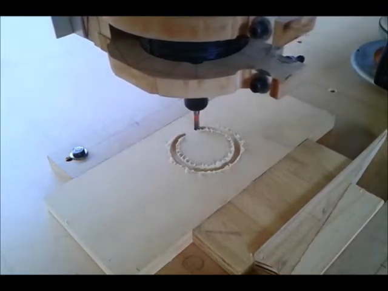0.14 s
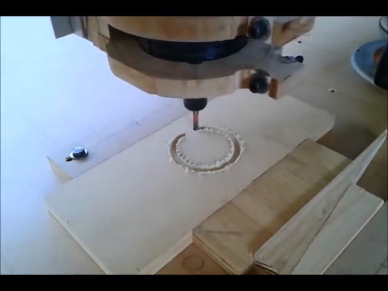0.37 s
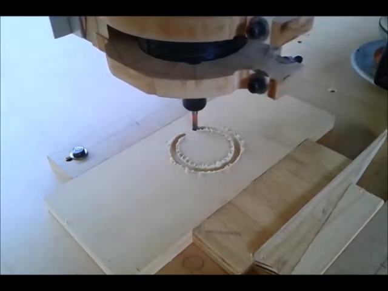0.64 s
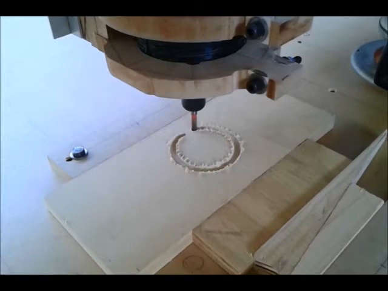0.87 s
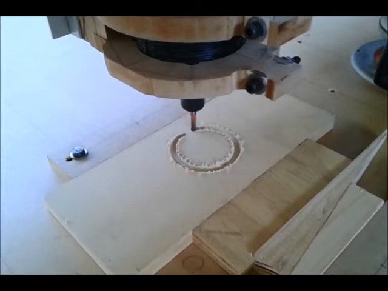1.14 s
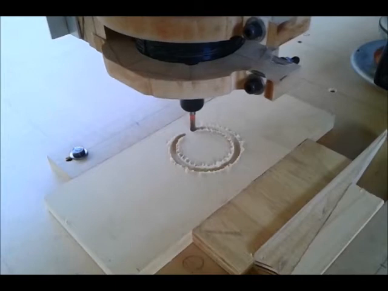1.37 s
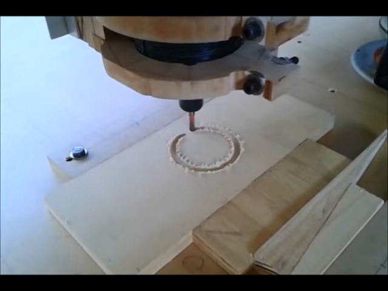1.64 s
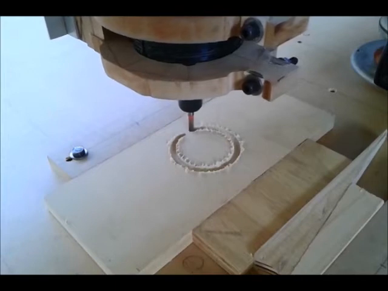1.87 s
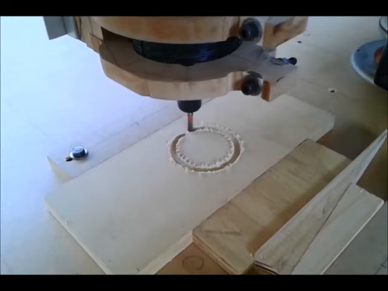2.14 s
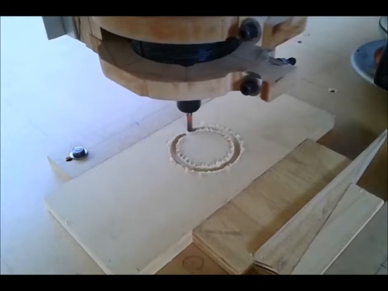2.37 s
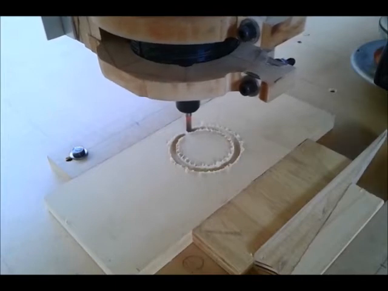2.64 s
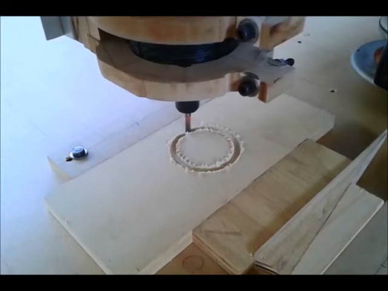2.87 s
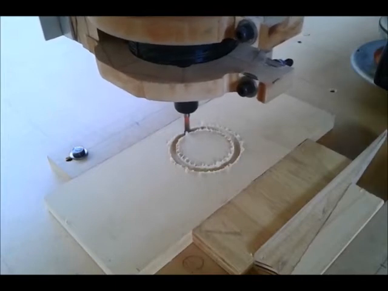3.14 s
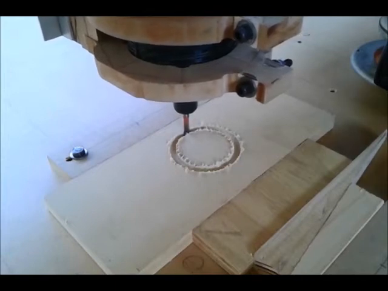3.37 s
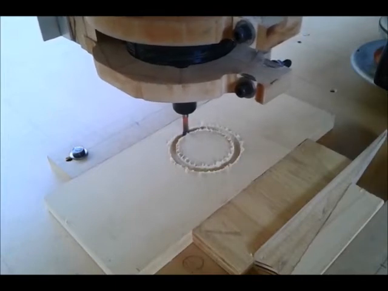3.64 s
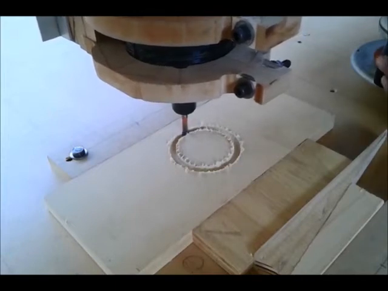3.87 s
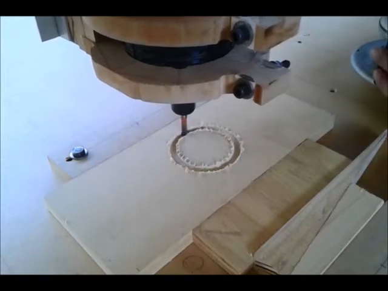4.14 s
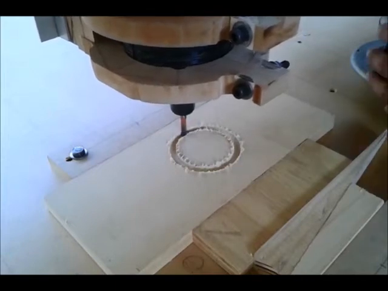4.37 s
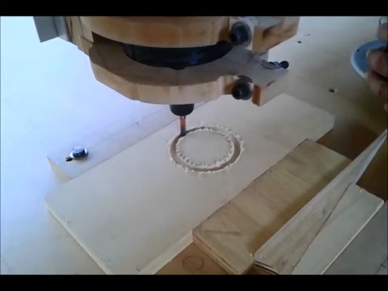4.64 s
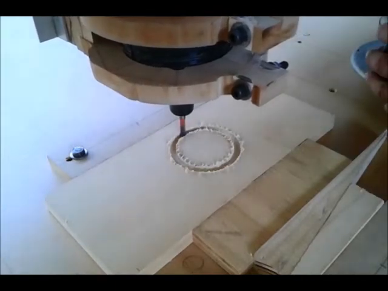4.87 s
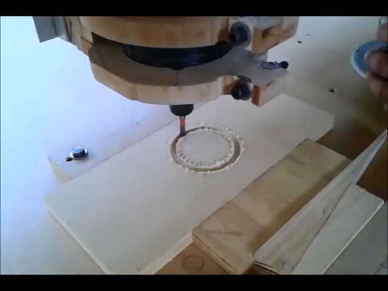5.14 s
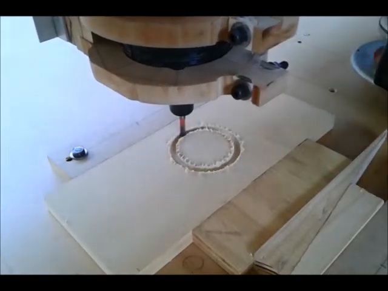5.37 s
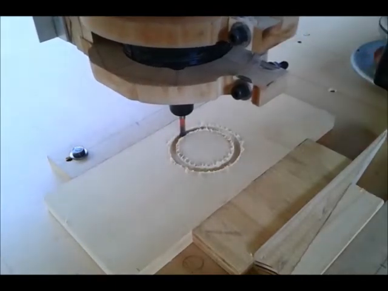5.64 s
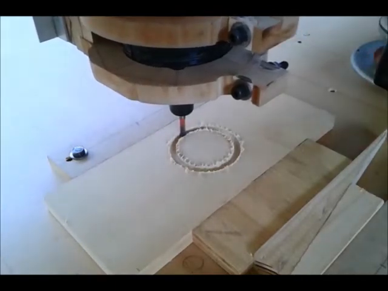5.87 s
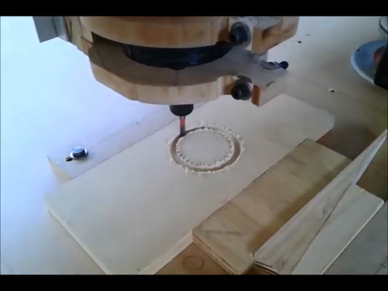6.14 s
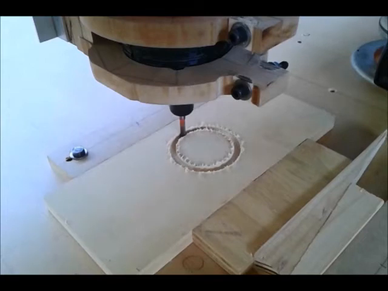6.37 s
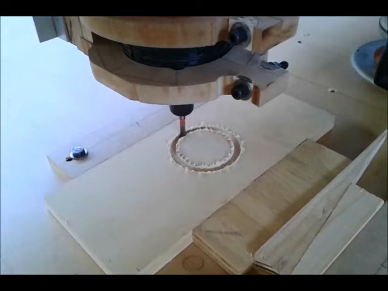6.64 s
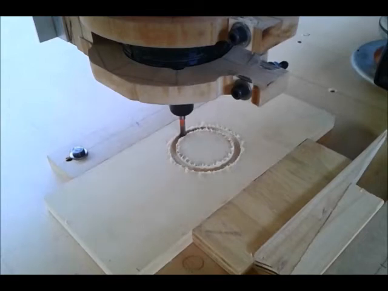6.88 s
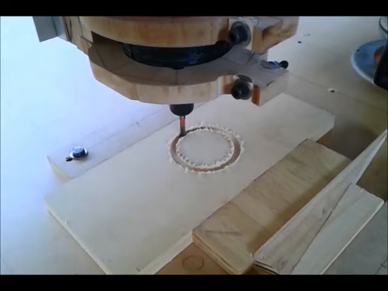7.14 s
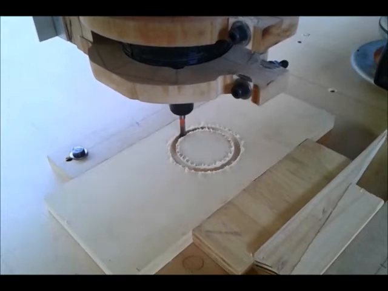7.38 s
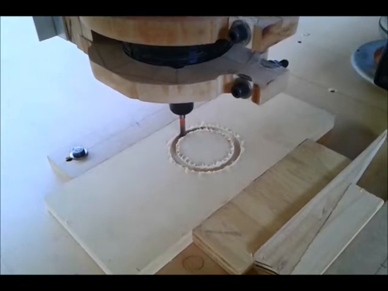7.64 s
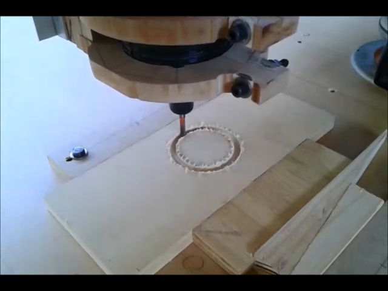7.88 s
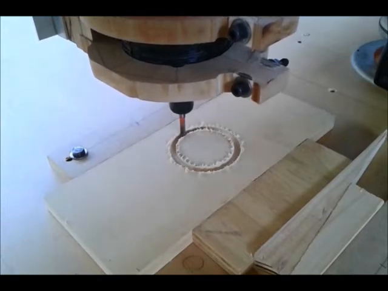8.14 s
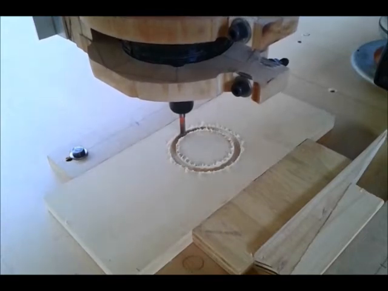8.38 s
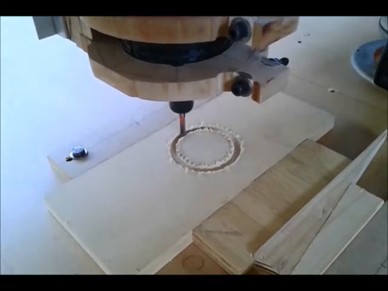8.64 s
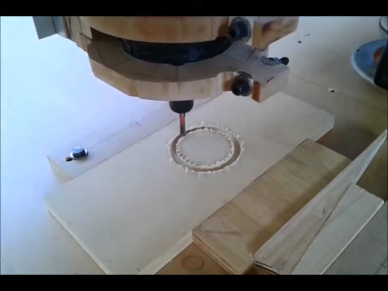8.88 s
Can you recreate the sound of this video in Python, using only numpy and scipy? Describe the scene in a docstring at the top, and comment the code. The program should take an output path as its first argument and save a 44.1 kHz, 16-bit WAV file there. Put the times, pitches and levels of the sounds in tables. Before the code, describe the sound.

A mains-powered hand router runs without a break close to a small camera microphone. It first cuts wood with a hard, steady buzzing whine and rushing air, turns rougher around three seconds, then speeds up slightly as the load eases. Faint feed motor hums change notes underneath. A single dull table knock comes halfway, then the tool spins lighter to the end. Dry, mono home workshop sound.

```python
"""Router cutting in a wooden frame

A mains-driven hand router whines close to a mono camera microphone: its bit bites a groove, then runs lighter
and the shaft speeds up. Shaft orders, fan and commutator are sines tied to one shaft phase, fuzzy whistles,
mostly from the bearings, are noise bands that follow it, and cooling air is a roar of shaped noise. Table
rumble, mains hum and feed motor notes lie underneath; one dull knock comes halfway."""
import sys
import numpy as np
from scipy import signal
from scipy.io import wavfile
from scipy.ndimage import uniform_filter1d

SR = 44100
rng = np.random.default_rng(int(sys.argv[2]) if len(sys.argv) > 2 else 0)


def amplitude_ratio(level_db):
    """Convert a level in decibels to the matching linear amplitude (field) ratio."""
    exponent = np.asarray(level_db, float) / 20
    return 10 ** exponent


def generate_wav(sig):
    """Save sig (samples, or channels by samples) to the path in sys.argv[1] as 16-bit PCM at SR."""
    pcm = np.round(np.clip(np.atleast_2d(sig).T, -1, 1) * 32767).astype(np.int16)
    wavfile.write(sys.argv[1], SR, pcm)


N = 397341
T = np.arange(N) / SR
SLOW = T[::100]  # order levels change slowly: worked out on every hundredth sample
MAINS_BEAT_HZ = 100  # twice the mains rate


def evened(x):
    """Scales to rms 1."""
    return x / np.sqrt(np.mean(x ** 2) + 1e-20)


def read(points, hz):
    """A spectrum read on a log-frequency axis."""
    f, value = np.transpose(points)
    return np.interp(np.log(hz + 1), np.log(f + 1), value)


def wander(per_s):
    """Slow random curve of rms 1: noise lowpassed at per_s Hz."""
    knots = rng.standard_normal(N // 200 + 2)
    smooth = signal.lfilter([1], [1, -np.exp(-2 * np.pi * per_s * 200 / SR)], knots)
    return np.interp(np.arange(N) / 200, np.arange(len(knots)), evened(smooth))


def tone(turns, db, waver_db, per_s):
    """A sine of given rms, at a random phase, whose strength wavers."""
    level = amplitude_ratio(db + waver_db * wander(per_s))
    return level * np.sqrt(2) * np.sin(2 * np.pi * (turns + rng.random()))


def coloured(db_field):
    """Noise from random short-time spectra under a bins x frames field of dB, at rms 1."""
    a, b = rng.standard_normal((db_field.shape[1], db_field.shape[0], 2)).T
    spectra = (a + 1j * b) * amplitude_ratio(db_field)
    return evened(signal.istft(spectra, nperseg=1024, noverlap=768)[1][:N])


def noise_grid():
    """Frame count and column of bin frequencies for coloured()."""
    return N // 256 + 5, np.fft.rfftfreq(1024, 1 / SR)[:, None]


def staged(values, at=T):
    """One value for each stage of the cut, blended as the cut goes on."""
    # progress of the cut: t/s, stage (0 deep with both flutes, 1 one flute biting, 2 skimming, 3 running free)
    stage = [(0, 0), (2.4, 0.06), (2.82, 0.36), (2.95, 1.53), (3.3, 0.6), (4.3, 1.2), (5.4, 1.87), (6.1, 2),
             (7.1, 2), (7.7, 3), (9.01, 3)]
    progress = np.interp(at, *np.transpose(stage))
    return np.interp(progress, np.arange(len(values)), values)


def order_db(multiple):
    """Level of one shaft order: its stages plus its swells."""
    # orders of bit and frame, housing, fan and commutator:
    # multiple of the shaft speed, then rms level/dB in each of the four stages
    order_levels = [(1, -37, -31.5, -41.5, -42), (2, -19.5, -28.5, -29, -31.5), (3, -51, -28.5, -33, -33),
                    (4, -28, -32.5, -36.5, -33.5), (5, -52, -32, -33.5, -37), (6, -39, -30, -33.5, -38.5),
                    (7, -36.5, -27, -31, -40), (8, -19.5, -22.5, -23, -36), (9, -34, -20.5, -24, -30),
                    (10, -35.5, -31, -34, -30.5), (11, -32, -32, -33, -29.5), (12, -37, -38, -35, -54),
                    (13, -42, -42, -35, -34), (14, -37, -35, -40, -39), (17, -46, -39, -41, -35),
                    (18, -52, -46, -48, -46), (15, -22.5, -23, -20.5, -20.5), (16, -36.5, -40, -32, -36),
                    (22, -28, -30, -25.5, -23.5)]
    # single orders swell or sink for a moment: centre t/s, time from there to 1/e of the change/s,
    # multiple of the shaft speed, change/dB
    swells = [(0, .4, 10, -8), (0, 0.49, 11, -8), (0.503, 0.11, 8, -3.5), (1.08, .12, 1, -10),
              (1.104, 0.26, 8, 2), (2.2, 0.37, 5, 8), (2.2, .25, 10, 7), (2.4, 0.22, 8, -4.5),
              (2.45, 0.3, 1, 1.5), (2.6, 0.33, 15, -3), (2.8, .06, 2, -3), (2.93, .12, 2, 8.5),
              (2.92, 0.18, 9, -14), (2.95, .15, 6, -6), (3.05, .35, 13, 6), (3.2, .15, 7, -1),
              (3.35, 0.22, 10, -8), (3.42, .07, 11, -14), (3.6, 0.97, 1, 7.5), (3.65, .2, 12, 4),
              (2.55, 0.082, 9, 9), (2.497, 0.49, 4, 2.5), (2.7, 0.19, 7, -1.5), (2.85, .12, 8, -8),
              (2.964, .07, 7, 7), (3.206, 0.13, 9, 3), (3.02, .15, 4, 4), (3.25, 0.5, 4, 11),
              (3.414, 0.13, 8, 5.5), (3.48, 0.037, 9, -13), (3.65, .06, 15, -14), (3.55, 0.34, 15, -7),
              (3.75, 0.44, 16, 13), (3.52, 0.16, 7, 7), (3.57, 0.049, 8, -11), (3.1, .2, 3, 2.5),
              (3.75, 0.27, 3, 7), (3.72, 0.08, 9, 6.5), (3.8, .1, 8, 2), (3.8, 0.27, 6, 8.5),
              (4.1, .25, 10, 2), (4.094, 0.12, 18, 15), (4.015, 0.12, 8, -13), (4.06, .13, 9, -13),
              (4.196, 0.49, 5, 8.5), (4.04, 0.08, 7, -1), (4.3, 0.26, 7, 7), (4.35, 0.18, 6, -20),
              (4.407, .18, 8, -9), (4.425, 0.14, 9, 6), (4.5, .2, 17, 6), (4.55, 0.32, 16, -9),
              (4.65, 0.27, 4, -3), (4.62, 0.38, 2, -6), (4.95, 0.12, 7, -31), (4.85, 0.25, 1, 4.5),
              (5.1, 0.59, 15, -4.5), (5.052, 0.38, 5, 6), (5.1, 0.4, 9, 2), (6.2, 0.27, 1, -6),
              (7.35, 0.16, 7, 5)]
    level = staged(next(row[1:] for row in order_levels if row[0] == multiple), SLOW)
    for s, half, k, db in swells:
        if k == multiple:
            level = level + db * np.exp(-((SLOW - s) / half) ** 2)
    return np.interp(T, SLOW, level)


def shaft_turns():
    """Shaft phase in turns: the speed sags under load, rises as the cut eases and trembles slightly."""
    # shaft speed: t/s, f/Hz
    speed = [(0, 401.8), (1.8, 401.6), (2.4, 401.1), (2.68, 400.7), (2.94, 400.6), (3.07, 401),
             (3.33, 402.6), (3.59, 404.4), (3.85, 406), (4.24, 407.8), (4.63, 409.4), (5.02, 410.6),
             (5.28, 411.1), (5.73, 411.8), (6.39, 412.3), (7.05, 412.8), (8.04, 413.2), (9.01, 413.3)]
    tremble_hz = 0.12 * wander(8)
    return np.cumsum(np.interp(T, *np.transpose(speed)) + tremble_hz) / SR


def shaft_orders(turns):
    """Bit and unbalance shake the frame on whole multiples of the shaft speed."""
    # weak orders that come and go: multiple of the shaft speed, rms level/dB
    faint = [(19, -50), (20, -42), (21, -48), (23, -60), (27, -47.5), (30, -51)]
    strong = sum(tone(k * turns, order_db(k), 1.0, 3.8) for k in range(1, 10))
    return strong + sum(tone(k * turns, db, 1.6, 3) for k, db in faint)


def rotor(turns):
    """Fan, commutator and housing tones; torque throbs at twice the mains rate and splits side tones off the fan."""
    fan_blades, bars = 15, 22
    # housing tones: multiples of the shaft speed
    housing_orders = (10, 11, 12, 13, 14, 16, 17, 18)
    # tones one mains beat under (first row) and over (second row) the fan tone: rms level/dB in each stage
    side_tones = [(-48, -38, -31, -27.5), (-34, -29.5, -35.5, -37)]
    under_db, over_db = map(staged, side_tones)
    fan_turns, beat = fan_blades * turns, MAINS_BEAT_HZ * T
    fan = tone(fan_turns, order_db(fan_blades), 0.68, 9.6)
    sides = tone(fan_turns - beat, under_db, 1.5, 4.5) + tone(fan_turns + beat, over_db, 1.5, 4)
    commutator = tone(bars * turns, order_db(bars), 0.93, 6.9)
    housing = sum(tone(k * turns, order_db(k), 2.2, 2.3) for k in housing_orders)
    return fan + commutator + sides + housing


def bearing(turns):
    """Fuzzy whistles between and beside the orders, most of them likely from the bearings: noise bands carried
    by the shaft."""
    # whistles: multiple of the shaft speed, width/Hz, rms level/dB cutting deep, rms level/dB later
    whistles = [(2.0, 28, -45, -30), (2.562, 24, -33, -28.5), (3.58, 7, -45, -39), (5.58, 6, -45, -40),
                (7.76, 20, -32, -50), (7.94, 6, -30, -50), (8.94, 6, -30, -50), (9.94, 6, -35, -50)]
    out = np.zeros(N)
    for multiple, width_hz, *stage_db in whistles:
        pole = np.exp(-np.pi * width_hz / SR)
        a, b = signal.lfilter([1], [1, -pole], rng.standard_normal((2, N)))
        band = ((a + 1j * b) * np.exp(2j * np.pi * multiple * turns)).real
        out += amplitude_ratio(staged(stage_db)) * evened(band)
    return out


def roar(turns):
    """Air and chips roar through the frame as shaped noise, pulsing a little each turn and each mains beat."""
    # spectrum of air and wood before scaling: f/Hz, level/dB per Hz
    air = [(60, -31.5), (130, -26.5), (300, -17), (600, -5), (900, -.5), (1250, -2.5), (1600, -10.5),
           (2050, -15.5), (2550, -10.5), (3000, -5.5), (4300, -4.5), (5150, -13), (7300, -13), (9000, -15),
           (10300, -20), (13500, -25.5)]
    # resonances of frame and housing, on the same scale:
    # f/Hz, width at -6 dB/Hz, level/dB cutting deep, level/dB running light
    rings = [(831, 29, -16.5, 4), (3160, 120, -1, -11), (3840, 150, -2.5, -6.5), (6190, 920, -4.5, -4.5),
             (200, 62, -12.5, -31.5)]
    # roar in each stage: level/dB
    roar_db = (-15.5, -16, -15, -14.5)
    # how far the roar has turned light in each stage: share (0-1)
    easing = (.2, .4, .45, .9)
    frames, hz = noise_grid()
    eased = staged(easing)
    share = np.clip(eased[np.minimum(np.arange(frames) * 256, N - 1)], 0, 1)
    power = amplitude_ratio(2 * read(air, hz))  # amp of doubled dB is power
    for f, width, deep_db, light_db in rings:
        ring_db = deep_db + share * (light_db - deep_db)
        power = power + amplitude_ratio(2 * ring_db) / (1 + (2 * (hz - f) / width) ** 2) ** 2
    patches = rng.standard_normal((frames, len(hz))).T
    patches = evened(uniform_filter1d(uniform_filter1d(patches, 10, 0), 12, 1))
    brighter_db = 0.69 * share * np.clip(hz / 9000, 0, 1)  # a little more treble as the cut eases
    pulse = 1 + 0.054 * np.cos(2 * np.pi * turns) + 0.07 * np.cos(2 * np.pi * MAINS_BEAT_HZ * T)
    return amplitude_ratio(staged(roar_db)) * pulse * coloured(10 * np.log10(power) + brighter_db + 0.77 * patches)


def table_rumble():
    """The table rumbles as low noise around 130 Hz and hums; both sink while the feed rests."""
    # common level of rumble and hum in each stage: level/dB
    rumble_db = (-45.5, -44.5, -45.5, -50)
    # rest of the feed: start t/s, end t/s
    feed_pause = (4.9, 7.08)
    # hum in the table: f/Hz, rms level/dB against the common level
    hums = [(100, -10)]
    pause_db, pause_edge_s = -22, 0.1
    inside_s = np.minimum(T - feed_pause[0], feed_pause[1] - T)
    resting = np.clip(inside_s / pause_edge_s + 0.5, 0, 1)
    frames, hz = noise_grid()
    low = coloured(-12 * np.log2((hz + 1) / 130) ** 2 + np.zeros(frames))
    hum = sum(tone(f * T, db, 2.2, 3.3) for f, db in hums)
    return amplitude_ratio(staged(rumble_db) + pause_db * resting) * (0.4 * low + hum)


def steppers():
    """The feed motors hum one note for each straight piece of the curve that they trace."""
    # notes: start t/s, end t/s, f/Hz, rms level/dB
    notes = [(-.1, 1.9, 300, -47), (.2, 0.96, 126, -45.5), (1.05, 1.95, 127.6, -50), (2.1, 2.8, 127.3, -49),
             (2.65, 3, 229.7, -44), (2.88, 3.4, 212, -47), (3.28, 3.74, 167, -43.5),
             (3.5, 3.86, 130.6, -47), (3.95, 5.3, 130, -51), (4.1, 4.4, 200, -51), (7.3, 9.1, 131, -47)]
    out = np.zeros(N)
    for start, end, hz, db in notes:
        held = np.clip(np.minimum(T - start, end - T) / 0.04, 0, 1)  # 40 ms fades
        out += held * tone(hz * T, db, 0.91, 3.3)
    return out


def knock():
    """One dull knock on the table: a decaying sine with an 8 ms attack."""
    # start t/s, f/Hz, level/dB where the decay starts, time to fall 60 dB/s
    thud = [4.898, 325, -19, .13]
    s, hz, db, t60 = thud
    t = np.maximum(T - s, 0)
    attack = np.minimum(t / 0.008, 1)
    return amplitude_ratio(db - 60 * t / t60) * attack * np.sin(2 * np.pi * hz * t)


def scene():
    """All router parts follow one shaft; both channels carry the same mono sound."""
    turns = shaft_turns()
    router = shaft_orders(turns) + rotor(turns) + bearing(turns) + roar(turns)
    mono = router + table_rumble() + steppers() + knock()
    return np.array([mono, mono])


def top_cut(x):
    """Nothing passes above the cut-off."""
    return signal.sosfilt(signal.butter(12, 13650, fs=SR, output="sos"), x)


def record(dry):
    """A small microphone without deep bass and with soft overload; the camera mutes bands too faint to keep."""
    # faintest band that the camera keeps: f/Hz, level/dB per band
    faintest = [(60, -60), (130, -57), (220, -55), (330, -63), (9000, -66), (10000, -58.5), (11500, -56.5),
                (13500, -56)]
    thin = signal.sosfilt(signal.butter(4, 80, "high", fs=SR, output="sos"), dry)
    overloaded = 1.4 * np.tanh(thin / 1.4)
    window = np.sqrt(signal.windows.hann(2048, sym=False))
    hz, s, z = signal.stft(overloaded, SR, window, 2048, 1024)
    # power is averaged over three neighbouring bands
    band_db = 10 * np.log10(uniform_filter1d(abs(z) ** 2, size=3, axis=1) + 1e-20)
    drift_db = np.interp(s, T, wander(3))
    bar_db = read(faintest, hz)[:, None] + drift_db
    kept = signal.istft(z * (band_db > bar_db), SR, window, 2048, 1024)[1]
    # faint low self-noise; the lowpass takes it further down
    hiss = signal.lfilter([0.01], [1, -0.99], amplitude_ratio(-55) * rng.standard_normal(N))
    return top_cut(kept[:, :N] + hiss)


dry = scene()
out = record(dry)
generate_wav(out)
```